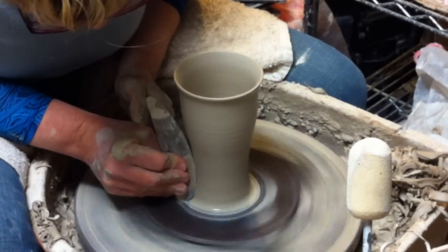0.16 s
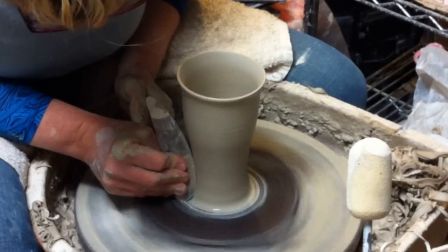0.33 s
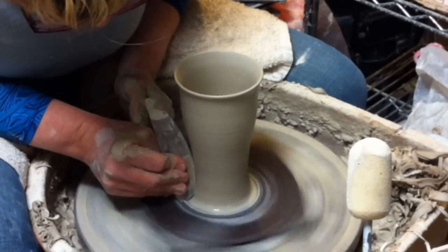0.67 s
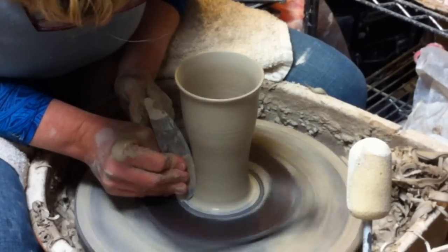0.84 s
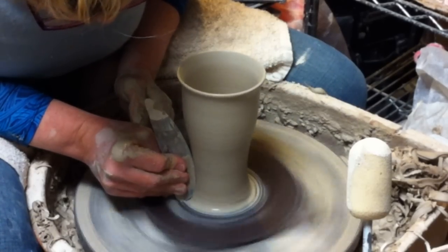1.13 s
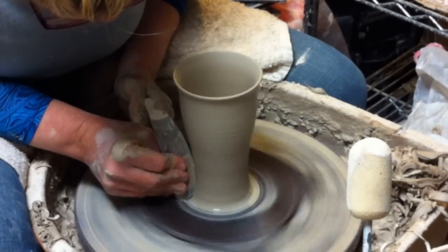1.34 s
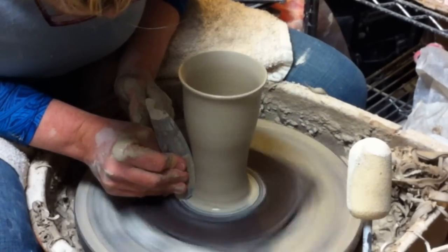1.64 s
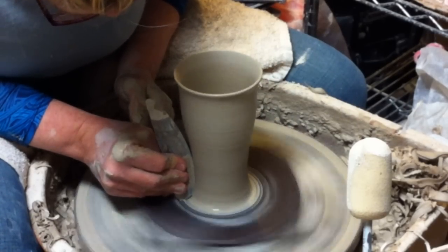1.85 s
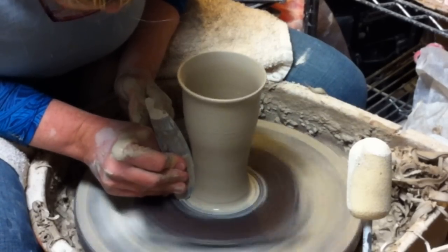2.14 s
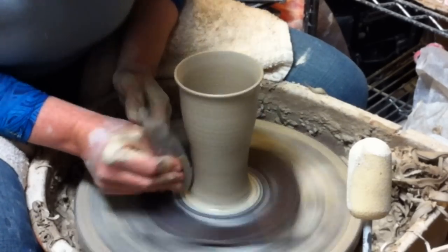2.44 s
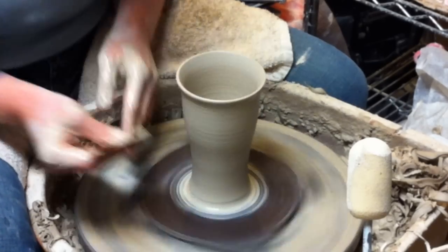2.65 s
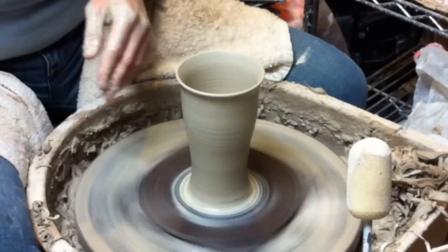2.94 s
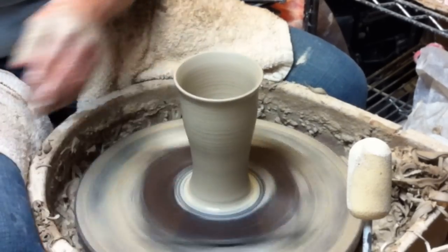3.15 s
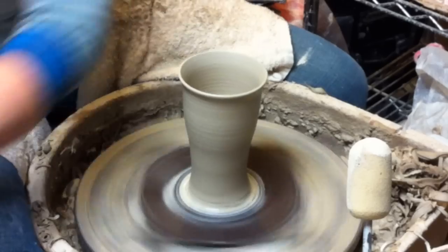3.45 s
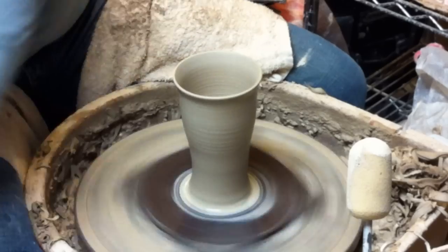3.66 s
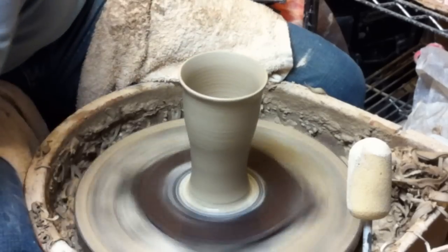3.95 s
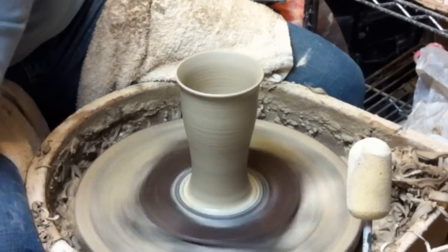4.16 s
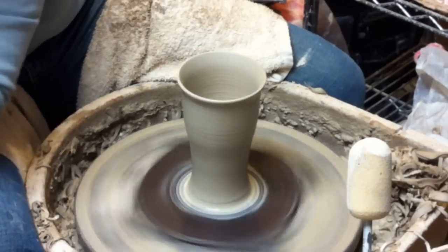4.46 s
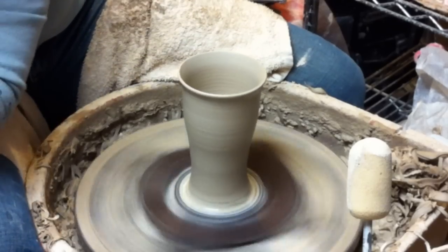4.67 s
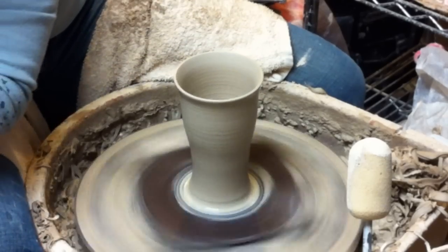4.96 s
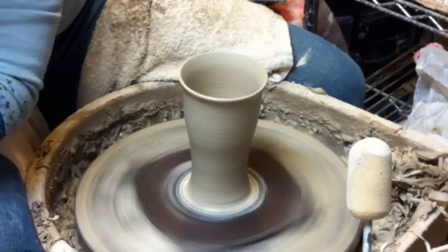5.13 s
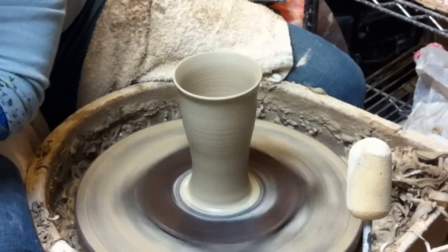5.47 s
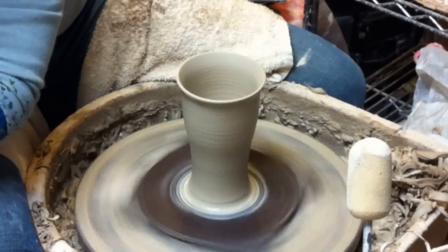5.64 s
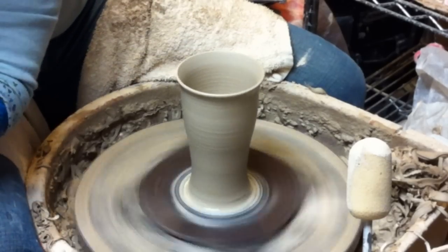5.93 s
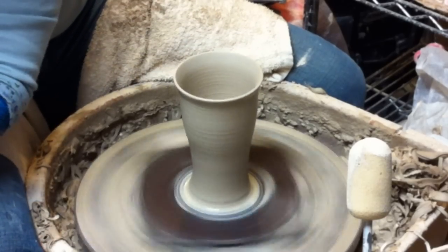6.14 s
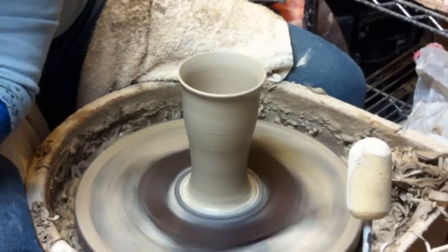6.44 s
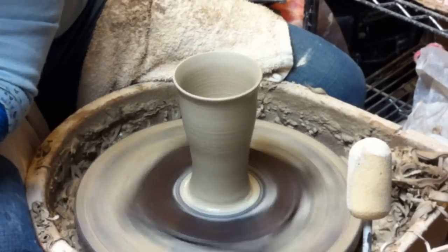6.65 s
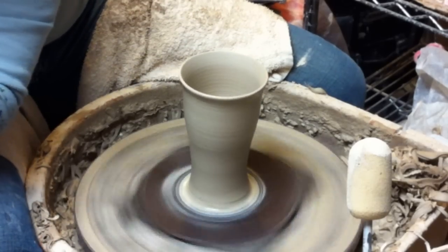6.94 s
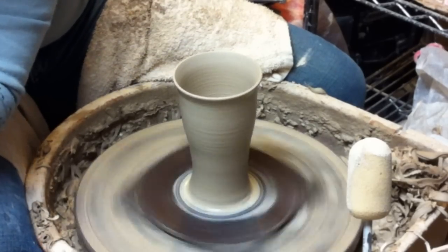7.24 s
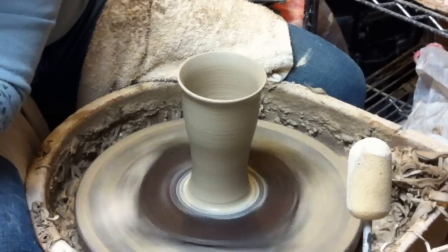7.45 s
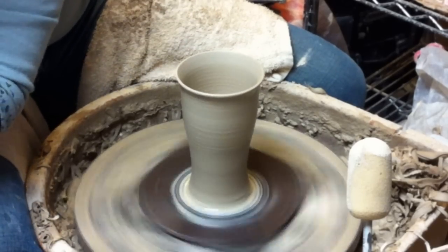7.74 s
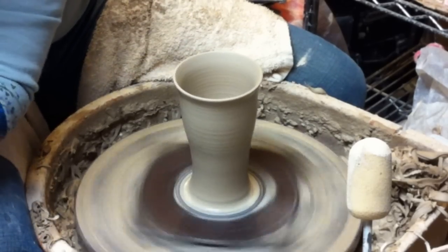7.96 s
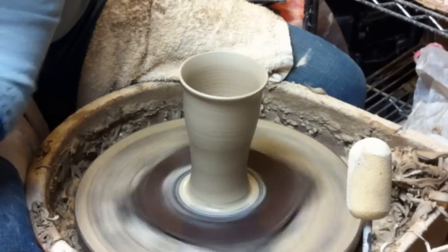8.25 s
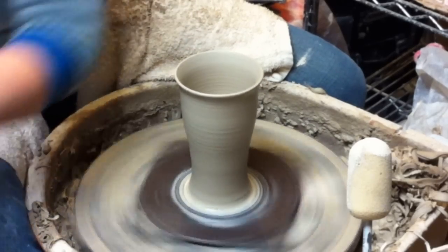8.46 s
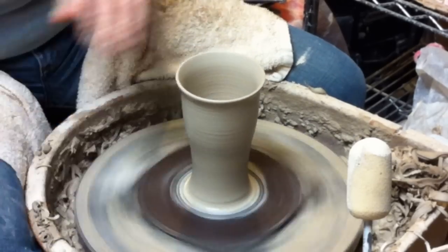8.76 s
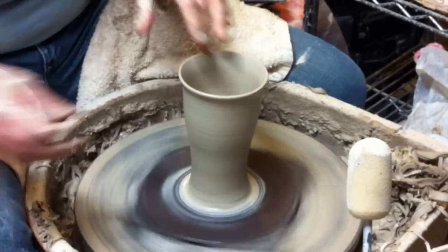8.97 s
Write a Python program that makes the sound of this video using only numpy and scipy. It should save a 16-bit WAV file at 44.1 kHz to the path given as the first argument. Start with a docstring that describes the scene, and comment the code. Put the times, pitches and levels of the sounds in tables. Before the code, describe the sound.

A pottery wheel hums steadily while a tool scrapes wet clay, then two quick water rinses splash and a plastic tub knocks.

```python
"""An electric pottery wheel hums in a small studio while a wooden tool scrapes the foot of a wet pot.
The scraping stops, then hands are rinsed twice in a water bucket: spray, splats, bubbles, wet crackle.
The wheel eases down and a plastic tub is bumped, faintly and then with a clear hollow knock.
Hum is phase-summed tones; rub, grit and water are random impacts or noise through resonators;
bubbles and tub are decaying sines, and water and tub get a short room tail."""
import sys
import numpy as np
from scipy import signal
from scipy.fft import rfft, irfft, next_fast_len
from scipy.io import wavfile

SR = 44100
rng = np.random.default_rng(int(sys.argv[2]) if len(sys.argv) > 2 else 0)


def generate_wav(signal):
    """Clip the signal to [-1, 1] and save it as 16-bit WAV at the path in sys.argv[1]."""
    frames = np.transpose(np.atleast_2d(signal))
    scaled = np.clip(frames, -1, 1) * 32767
    pcm = np.round(scaled).astype(np.int16)
    wavfile.write(sys.argv[1], SR, pcm)


N = 401301
T = np.arange(N) / SR

# motor speed, heard as the pitch of its hum: t/s, f/Hz
MOTOR_SPEED = [(0, 281.1), (2.3, 280.9), (2.8, 282), (7.0, 281.8), (7.3, 268), (7.55, 260), (7.85, 252),
               (8.3, 246.5), (8.8, 244), (9.1, 250)]


def undb(db):
    """Decibels to gain."""
    return 10 ** (np.asarray(db) / 20)


def unit(x):
    """Scale to rms 1."""
    return x / np.std(x)


def curve(rows, column=1):
    """One column of a table, joined by straight lines in time."""
    rows = np.array(rows)
    return np.interp(T, rows[:, 0], rows[:, column])


def walk(rate):
    """Smooth random drift with a spread near 1, taking a new value `rate` times a second."""
    knots = rng.standard_normal(2048)
    return 1.17 * np.interp(T * rate, np.arange(len(knots)), knots)


def hump(x, half_width):
    """A smooth rise and fall around x = 0, down to 1/e at half_width."""
    return np.exp(-(x / half_width) ** 2)


def decay(t, t60):
    """Exponential decay, 60 dB down after t60 seconds."""
    return np.exp(-np.log(1000) * t / t60)


def band(x, hz, width):
    """A damped resonator, gain 1 at its centre."""
    hz = min(hz, .45 * SR)
    return signal.lfilter(*signal.iirpeak(hz, hz / min(width, SR / 3), fs=SR), x)


def butter(x, order, hz, kind="low"):
    """A smooth low-, high- or band-pass filter."""
    return signal.sosfilt(signal.butter(order, hz, kind, fs=SR, output="sos"), x)


def colour(x, points):
    """Shape a sound by a broad spectrum; rms 1."""
    hz, db = np.transpose(points)
    size = next_fast_len(N)
    freqs = np.maximum(np.arange(size // 2 + 1) * SR / size, 1)
    gain = undb(np.interp(np.log(freqs), np.log(hz), db))
    return unit(irfft(rfft(x, size) * gain, size)[:N])


def clicks(rate, spread_db):
    """Random tiny impacts, most weak and a few strong; rms 1."""
    out = np.zeros(N)
    place, strength, side = rng.random((int(rate * N / SR), 3)).T
    lift_db = spread_db * np.minimum(-np.log(1 - strength), 5)
    out[(place * N).astype(int)] = np.sign(side - .5) * undb(lift_db)
    return unit(out)


def add(out, s, x, db):
    """Mix in a short sound at time s with its peak at db."""
    i = int(s * SR)
    out[i:i + len(x)] += (x * undb(db) / np.abs(x).max())[:N - i]


def turns():
    """How many turns the wheel has made, from the summed cycles of the hum."""
    hum_cycles_per_turn = 167
    return np.cumsum(curve(MOTOR_SPEED)) / SR / hum_cycles_per_turn


def studio(x, wet_db):
    """Shelves and walls return a short tail of decaying noise bands, the treble dying first."""
    # the studio's decay: f/Hz, t60/s
    room_decay = [(200, 0.37), (1000, 0.4), (4000, 0.17), (14000, 0.14)]
    room_hz, room_t60 = np.transpose(room_decay)
    t, tail = T[:SR // 2], 0
    edges = np.geomspace(125, 16000, 8)
    for lo, hi in zip(edges, edges[1:]):
        octave = butter(rng.standard_normal(len(t)), 2, [lo, hi], "band")
        tail = tail + octave * decay(t, np.interp(np.sqrt(lo * hi), room_hz, room_t60))
    tail = tail * (t > .003)  # a gap ahead of the first reflections
    return x + undb(wet_db) * signal.fftconvolve(x, tail / np.linalg.norm(tail))[:N]


def drive(level_db=-56.5, sway_db=.5):
    """Bearings and belt rumble: noise rings the wheel's frame, its level swaying a little."""
    # bearing and belt noise with the studio air: f/Hz, relative level/dB per Hz
    drive_colour = [(25, -31), (70, -36), (100, -18), (150, -4.5), (260, -1), (320, -2), (390, 0.5),
                    (620, -0.5), (900, -0.5), (1800, -4.5), (3000, -14), (4600, -15.5), (10000, -22),
                    (15500, -21)]
    # resonances of the wheel's frame: f/Hz, width/Hz, gain of the added ring/dB
    frame_modes = [(375, 28, -7), (498, 74, 0.5), (687, 26, -0.5), (802, 8.4, 1), (1082, 50, -7),
                   (1880, 50, -9), (4320, 330, -7.5)]
    rumble = colour(rng.standard_normal(N), drive_colour)
    rumble = rumble + sum(undb(db) * band(rumble, hz, width) for hz, width, db in frame_modes)
    return unit(rumble) * undb(level_db + sway_db * walk(9))


def motor(flutter=0.0016, shimmer_db=0.73, waver_db=.5):
    """The motor's hum and overtones follow its speed, swelling once a turn, over steady mains tones."""
    # the hum before the frame colours it, sagging while the wheel runs free:
    # t/s, fundamental rms level/dB, octave rms level/dB
    hum_levels = [(0, -53.5, -58.5), (2.2, -53.5, -58.5), (3.1, -56.5, -59.5), (4.07, -63.5, -61),
                  (4.22, -58.5, -59.5), (4.7, -56, -57.5), (7, -56, -56.5), (9.1, -57, -57.5)]
    # how well the frame carries the hum at each pitch: f/Hz, gain/dB
    frame_carry = [(246, -14), (252, -7), (258, -1), (266.5, 1.5), (269.5, -7), (271, -5), (274.5, 3),
                   (281, 0), (490, 0), (500, 3), (520, 3.5), (526, -7), (535, 2), (550, -5), (561, 0)]
    # weak overtones of the hum: multiple of its pitch, mean rms level/dB
    overtone_levels = [(3, -76), (4, -76.5), (5, -75)]
    # steady tones of the supply and the frame: f/Hz, rms level/dB
    mains_tones = [(60, -104), (120, -75), (903, -72.5)]
    wobble_db, loudest_place = 0.86, 0.24  # place is a fraction of a turn

    pitch = curve(MOTOR_SPEED)
    phase = 2 * np.pi * np.cumsum(pitch * (1 + flutter * walk(14))) / SR
    wobble = wobble_db * np.cos(2 * np.pi * (turns() - loudest_place))
    carry_hz, carry_db = np.transpose(frame_carry)

    # at low speed the fundamental falls below the frame's resonance and stays faint
    low_db = curve(hum_levels) + np.interp(pitch, carry_hz, carry_db)
    hum = undb(low_db + wobble + waver_db * walk(8)) * np.sin(phase)
    octave_db = curve(hum_levels, column=2) + np.interp(2 * pitch, carry_hz, carry_db)
    hum += undb(octave_db + wobble / 2 + shimmer_db * walk(16)) * np.sin(2 * phase)
    hum += sum(undb(db + 1.5 * walk(4.7)) * np.sin(k * phase) for k, db in overtone_levels)
    mains = sum(undb(db) * np.sin(2 * np.pi * hz * T) for hz, db in mains_tones)
    return np.sqrt(2) * (hum + mains)  # a sine's peak is sqrt(2) times its rms


def sleeves(quality=2.7):
    """Cloth slides in short soft swells of band-limited hiss."""
    # sleeves brushing as the arms move: t/s, rms level at the crest/dB, f/Hz, half length/s
    sleeve_strokes = [(2.99, -77, 5200, .05), (4.096, -62, 2100, .03), (4.234, -64, 2260, .03),
                      (5.854, -68, 3900, .06), (7.022, -67.5, 5270, .06), (8.13, -71, 2460, .06),
                      (8.55, -65.5, 2360, .06)]
    out, t = np.zeros(N), T[:SR // 2]
    for s, db, hz, half_s in sleeve_strokes:
        hiss = rng.standard_normal(len(t))
        hiss = unit(band(band(hiss, hz, hz / quality), hz, hz / quality))
        start = int((s - t.mean()) * SR)
        out[start:start + len(t)] += undb(db) * hiss * hump(t - t.mean(), half_s)
    return out


def fingers(patchy_db=3.5, rest_db=-78.5):
    """Films of wet clay part in tiny bright crackles, in several bands, over a faint resting level."""
    # wet fingers rubbing slip off each other: t/s, level at the crest/dB, half length/s
    finger_rubs = [(3.894, -64.5, 0.089), (4.27, -64, 0.091), (4.442, -66.5, 0.052), (5.63, -71, 0.11),
                   (6.488, -68.5, 0.091), (7.1, -73, 0.21), (7.634, -62, .07), (8.093, -70, 0.066),
                   (8.267, -64.5, 0.17), (8.682, -67, .12)]
    films_hz = np.geomspace(2500, 14000, 7)
    snaps = sum(band(clicks(260, spread_db=4.6), hz, hz / 3) for hz in films_hz)
    wet_colour = [(100, -40), (1500, -7), (4000, -3.5), (8000, -3), (13000, 2.5), (15500, -0.5)]
    crackle = colour(snaps, wet_colour)
    rubbing = sum(undb(db) * hump(T - s, half_s) for s, db, half_s in finger_rubs)
    return crackle * np.maximum(rubbing, undb(rest_db)) * undb(patchy_db * walk(45))


def ticks(hz=11000, width_hz=9400, t60=0.0073):
    """Single drops land near the microphone, each a very short, high snap of filtered noise."""
    # tiny drops ticking close by: t/s, peak level/dB
    tick_drops = [(4.2157, -32), (5.051, -29.5), (7.959, -30.5)]
    out, t = np.zeros(N), T[:SR // 32]
    for s, db in tick_drops:
        snap = rng.standard_normal(len(t)) * decay(t, t60)
        add(out, s, band(band(snap, hz, width_hz), hz, width_hz), db)
    return out


def bubbles(onset_cycles=1.1, wobble=0.028):
    """Trapped air rings as a wobbling, decaying sine; most bubbles climb in pitch, a few sink."""
    # bubbles: t/s, peak level/dB, starting f/Hz, t60/s, glide/octaves per s (climbs one octave at most)
    air_bubbles = [(4.479, -44, 1053, 0.066, 4), (4.6255, -34.5, 744, 0.031, -4),
                   (4.711, -39, 1730, .09, -2), (4.728, -37, 392, 0.086, 5), (4.745, -42, 1443, .05, 7),
                   (4.787, -42.5, 1194, .06, 4), (4.87, -43.5, 390, 0.21, -1),
                   (6.334, -48, 2595, .033, 0.5), (7.316, -37.5, 1040, .043, -6),
                   (7.567, -36, 4270, .025, -5), (7.706, -41.5, 3830, .04, 12), (7.722, -50, 395, .4, 16),
                   (7.752, -49.5, 825, 0.27, 23.5), (7.825, -42, 987, 0.075, 6),
                   (7.958, -41.5, 695, .08, 31.5), (7.990, -44, 1428, .09, 17.5),
                   (8.483, -47.5, 1200, .032, 6)]
    out, t = np.zeros(N), T[:SR // 5]
    for s, db, hz, t60, rise in air_bubbles:
        pitch = hz * 2 ** np.minimum(rise * t, 1) * (1 + wobble * walk(300)[:len(t)])
        phase = 2 * np.pi * np.cumsum(pitch) / SR
        swell = 1 - np.exp(-(t * hz / onset_cycles) ** 2)
        add(out, s, np.sin(phase) * swell * decay(t, t60), db)
    return out


def stirring(attack_s=0.031, fall_db_per_s=101):
    """Strength of the spray: each sweep of the hands rises quickly, holds and dies away."""
    # hands sweeping through the water: t at full strength/s, spray level/dB, hold/s
    swishes = [(4.632, -48, 0.14), (4.841, -48, .045), (7.249, -55, 0.063), (7.46, -59.5, .06),
               (7.56, -54.5, .005), (7.639, -56, 0.057), (7.91, -61.5, .03)]
    sweeps = []
    for s, db, hold in swishes:
        rise = np.clip(1 + (T - s) / attack_s, 0, 1)
        sweeps.append(rise * undb(db - fall_db_per_s * np.maximum(T - s - hold, 0)))
    return np.max(sweeps, axis=0)


def spray(patchy_db=3, crackle_db=-8, quality=9):
    """Stirred water: droplets of many sizes ping for a few cycles over a fine crackle."""
    # colour of the spray: f/Hz, relative level/dB per Hz
    water_colour = [(40, -70), (120, -45), (250, -20), (700, 2), (2000, 0), (4000, 0.5), (6500, 0),
                    (8500, -5), (15500, -0.5)]
    sizes_hz = np.geomspace(700, 15000, 22)
    pings = sum(band(clicks(110, spread_db=4.5), hz, hz / quality) for hz in sizes_hz)
    drops = unit(pings) + undb(crackle_db) * clicks(1500, spread_db=2.0)
    return colour(drops, water_colour) * stirring() * undb(patchy_db * walk(90))


def splats(snap_db=3, snap_s=0.00079):
    """Each slap of water is a sharp snap and a short burst in one band, with a bright spatter."""
    # slaps and drops: t/s, body peak level/dB, body f/Hz, body resonator width/Hz, spatter peak level/dB
    water_slaps = [(4.625, -37, 2400, 550, -48), (4.653, -29.5, 2200, 2000, -26),
                   (4.69, -38, 2200, 800, -42), (4.734, -25, 6300, 6000, -38),
                   (4.795, -37, 6050, 4000, -48), (4.845, -40, 4000, 6000, -40),
                   (4.871, -29, 4200, 6000, -27), (4.904, -35.5, 2600, 1300, -46),
                   (4.927, -26.5, 5900, 8000, -34), (4.986, -35.5, 3950, 2500, -49),
                   (5.006, -36, 6000, 1600, -49), (5.052, -32.5, 10900, 5000, -47),
                   (5.223, -43.5, 5600, 2000, -46), (7.2527, -24, 5160, 1900, -24),
                   (7.26, -28, 4000, 5000, -27), (7.316, -31, 1890, 2200, -35.5),
                   (7.346, -37, 12000, 7000, -45), (7.428, -38.5, 6170, 2600, -42),
                   (7.461, -33.5, 2920, 900, -35.5), (7.498, -39, 2980, 4000, -37),
                   (7.566, -39, 4530, 3500, -33.5), (7.641, -31.5, 4040, 4000, -30),
                   (7.686, -34, 5900, 2200, -46), (7.827, -37, 1800, 3000, -52),
                   (7.93, -41.5, 2380, 1600, -50), (7.959, -33.5, 6150, 1800, -36),
                   (7.991, -40.5, 2250, 1600, -49), (8.24, -39, 9000, 3600, -54),
                   (8.325, -47, 10000, 8000, -45)]
    t60_at_4k, shortening = 0.021, 0.64  # s, and the power of pitch that shortens it
    spatter_hz, spatter_width_hz, spatter_t60 = 9800, 13600, 0.036
    out, t = np.zeros(N), T[:SR // 8]

    def burst(hz, width, t60):
        """A snap and its dying hiss, passed twice through one resonator."""
        envelope = decay(t, t60) + undb(snap_db) * np.exp(-t / snap_s)
        x = rng.standard_normal(len(t)) * envelope
        return band(band(x, hz, width), hz, width)

    for s, db, hz, width, spatter_db in water_slaps:
        size = 4000 / hz  # lower pitch, larger slap
        add(out, s, burst(hz, width, t60_at_4k * size ** shortening), db)
        add(out, s, burst(spatter_hz, spatter_width_hz, spatter_t60), spatter_db)
    return out


def knocks(rattle_db=2, rattle_s=0.01, low_hz=230):
    """A blow rings and rattles the tub's modes; a softer contact dulls the upper ones."""
    # blows on the plastic tub: t/s, peak level/dB, low-pass of the contact f/Hz (lower is softer)
    tub_blows = [(7.3135, -37.5, 6000), (8.634, -25.5, 1080)]
    # the tub's modes ahead of the contact filter: f/Hz, relative level/dB, t60/s
    tub_modes = [(248, -12, 0.11), (330, -6, 0.049), (404, 0, 0.062), (496, -14, 0.048), (571, -9.5, 0.13),
                 (698, -3, 0.063), (818, -3.5, 0.064), (885, -7, 0.049), (1025, -5.5, 0.045),
                 (1540, -14, .04), (1680, -4, 0.026), (2120, -10, 0.042), (2980, -12, .025),
                 (4500, -21, .02), (6160, -7, 0.029)]
    out, t = np.zeros(N), T[:SR // 3]
    for s, db, soft_hz in tub_blows:
        ring = 0
        for k, (hz, mode_db, t60) in enumerate(tub_modes):
            # neighbouring modes swing in opposite directions
            ring = ring + (-1) ** k * undb(mode_db) * np.sin(2 * np.pi * hz * t) * decay(t, t60)
        rattle = butter(rng.standard_normal(len(t)), 1, 2500)
        blow = butter(ring + undb(rattle_db) * rattle * np.exp(-t / rattle_s), 1, soft_hz)
        # a small tub radiates no deep bass
        add(out, s, butter(blow, 4, low_hz, "high"), db)
    return out


def scrape(catch_db=0.85, grit_db=-2, shift_db=4.0, patch_db=3.5, ring_db=-2.0):
    """Clay grains slip under the tool and ring it; the contact shifts, so its modes swell in turn."""
    # the tool leans in slowly, digs deeper, then lifts off:
    # t/s, rub level before lumps and catches/dB, grit relative to rub before grit_db and lumps/dB
    tool_pressure = [(0, -53.3, -9), (.5, -53, -13.5), (1.25, -51, -15), (2.04, -50.5, -16),
                     (2.07, -49.3, -3), (2.23, -49.5, -4), (2.34, -51, -10), (2.37, -57.5, -15),
                     (2.42, -85, -13)]
    # high spots on the pot's foot that meet the tool on every turn:
    # place/turns, lift/dB, half width/turns
    foot_lumps = [(.04, 0.5, 0.063), (.27, 2.5, 0.13), (.52, 3.5, 0.07), (.86, 2, 0.12)]
    # broad colour of the rub: f/Hz, relative level/dB per Hz
    clay_colour = [(300, -43), (700, -12), (1200, -2), (1900, -1), (2700, -3), (3800, -7.5), (6000, -9.5),
                   (9000, -14.5), (15500, -21)]
    # resonances of the tool: f/Hz, width/Hz, mean gain within the ring/dB
    tool_modes = [(1344, 36, -4), (1600, 130, -2), (2000, 42, -3.5), (2245, 140, -7.5), (2410, 43, 1.5),
                  (4700, 200, -9), (7140, 200, -2.5)]
    grit_colour = [(1000, -20), (3000, 8.5), (6000, 6.5), (11500, 6.5), (15500, -3.0)]

    angle = turns()
    lumps = sum(db * hump((angle - place + .5) % 1 - .5, half) for place, db, half in foot_lumps)
    pressure = undb(curve(tool_pressure) + lumps + catch_db * walk(70))
    pressure = pressure * (T < tool_pressure[-1][0])

    # wetter and drier patches of clay favour different pitches
    patches = 0
    for hz in np.geomspace(600, 15000, 30):
        grains = band(clicks(2500, spread_db=2), hz, hz / 14)
        patches = patches + grains * undb(patch_db * walk(39.79))
    rub = colour(patches, clay_colour)
    ring = sum(band(rub, hz, width) * undb(db + shift_db * walk(20)) for hz, width, db in tool_modes)
    grit = colour(clicks(3200, spread_db=3.5), grit_colour)
    # the lumps lift the grit only half as much as the rub
    grit_gain = undb(curve(tool_pressure, column=2) - lumps / 2 + grit_db)
    return pressure * (unit(rub + undb(ring_db) * unit(ring)) + grit_gain * grit)


def scene():
    """Wheel, tool, sleeves and ticks dry; water and tub with a room tail; left and right alike."""
    washing = spray() + fingers() + splats() + bubbles()
    close = drive() + motor() + sleeves() + ticks() + scrape()
    mono = close + studio(washing, wet_db=-6.5) + studio(knocks(), wet_db=-8.5)
    return np.array([mono, mono])


def record(dry, top_hz=15900):
    """The recorder cuts the top with a steep low-pass."""
    return signal.sosfilt(signal.ellip(10, .2, 70, top_hz, fs=SR, output="sos"), dry)


dry = scene()
out = record(dry)
generate_wav(out)
```